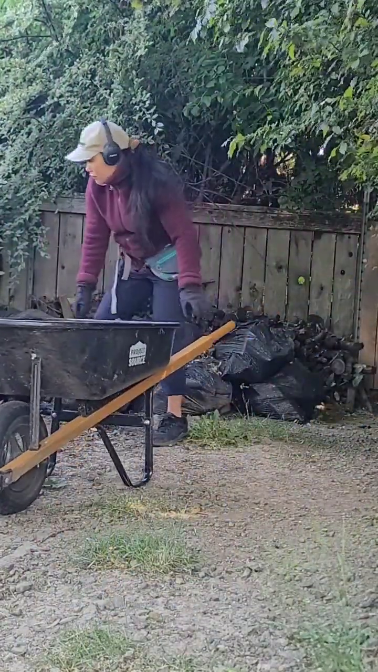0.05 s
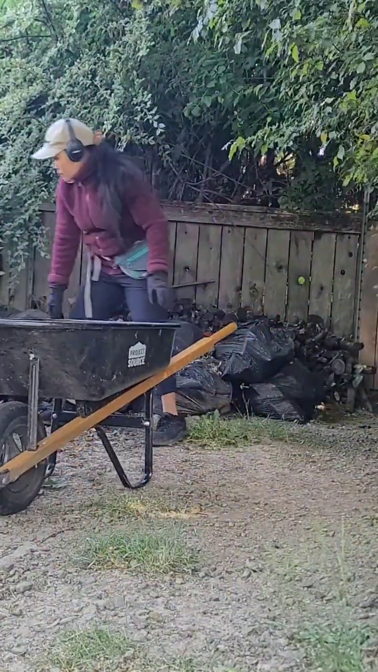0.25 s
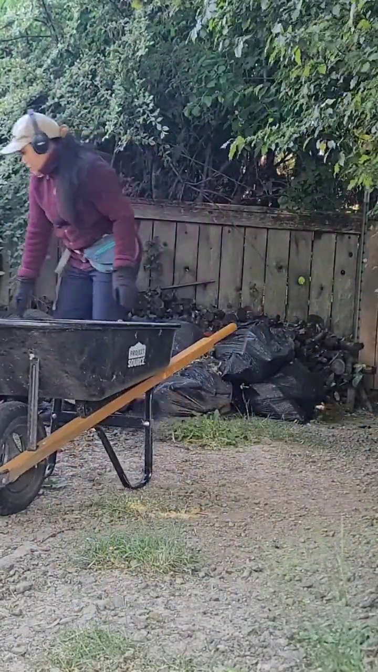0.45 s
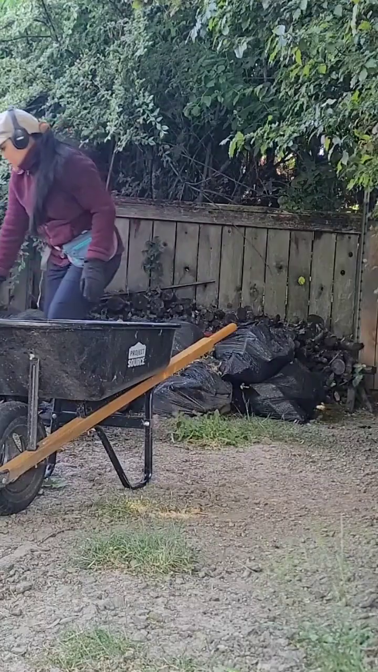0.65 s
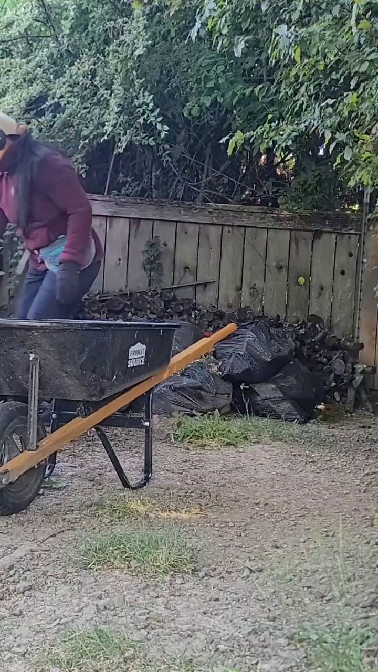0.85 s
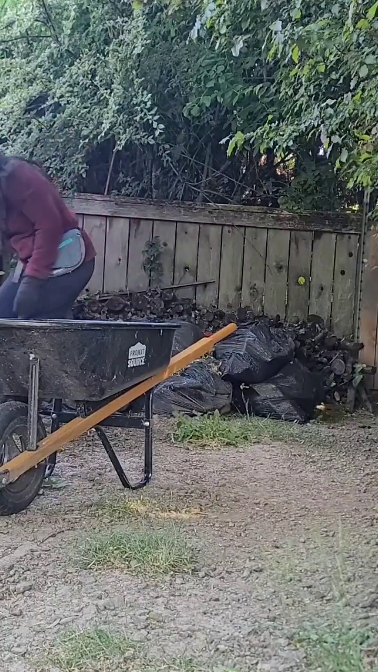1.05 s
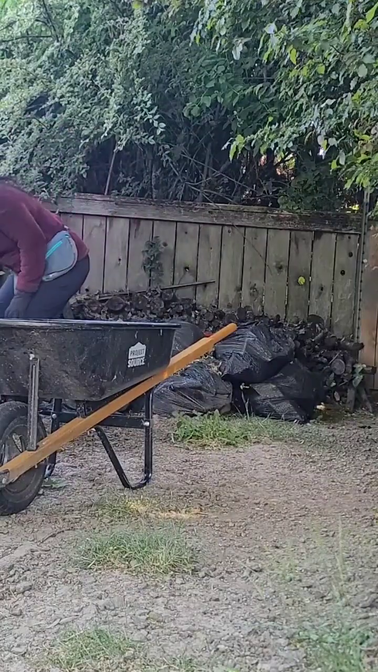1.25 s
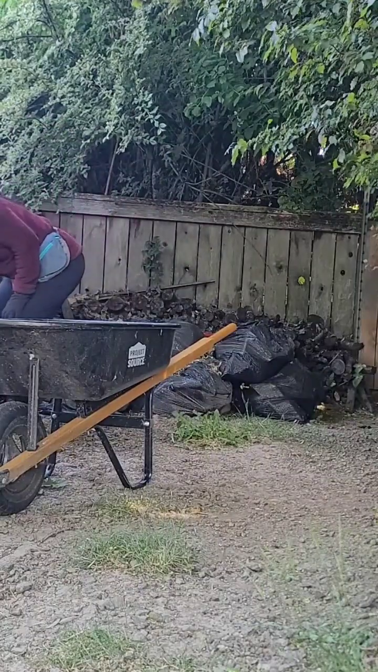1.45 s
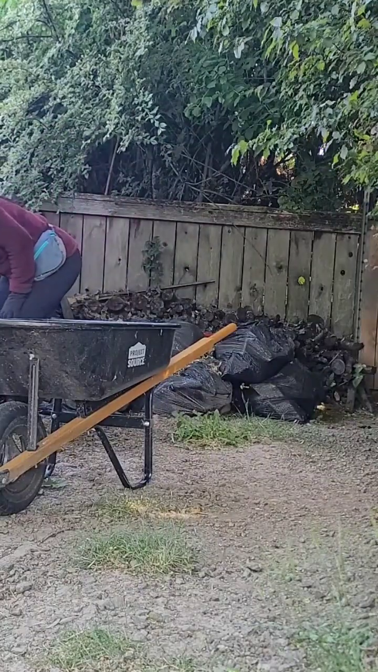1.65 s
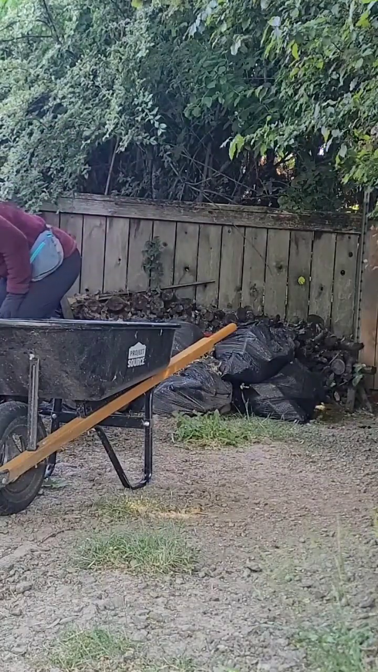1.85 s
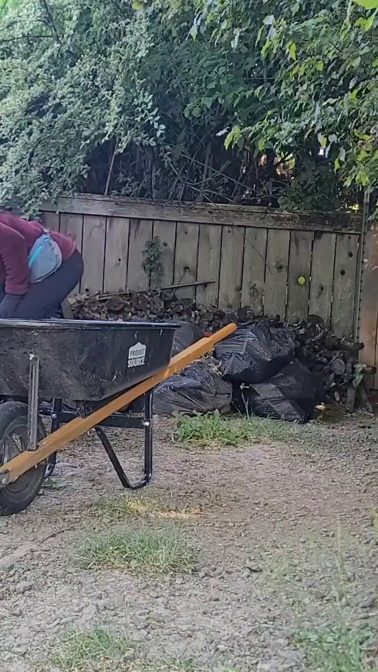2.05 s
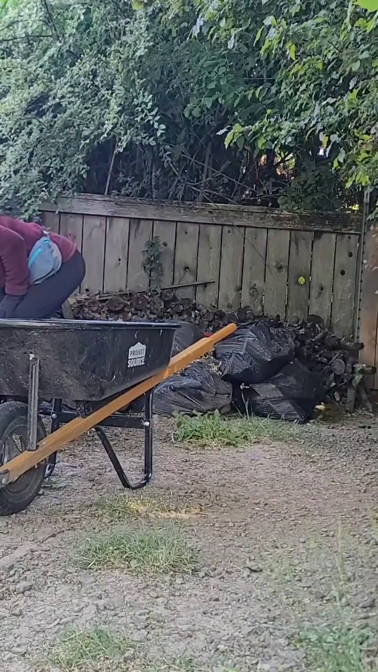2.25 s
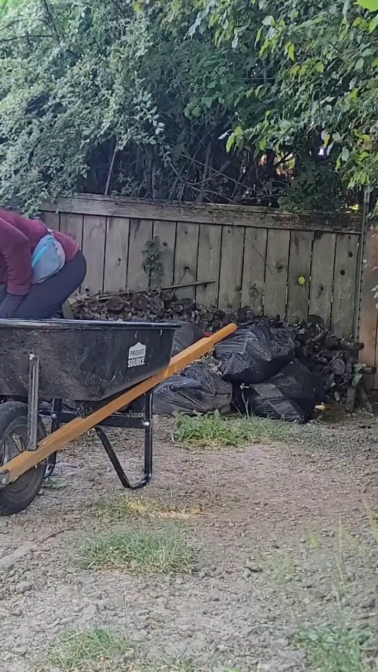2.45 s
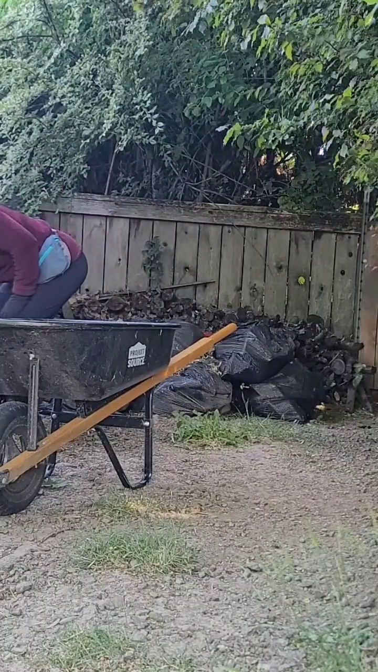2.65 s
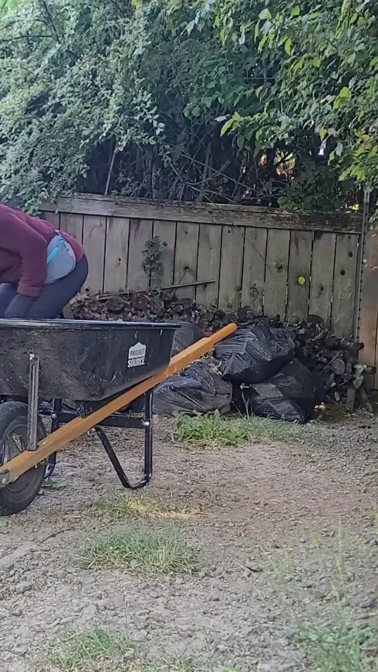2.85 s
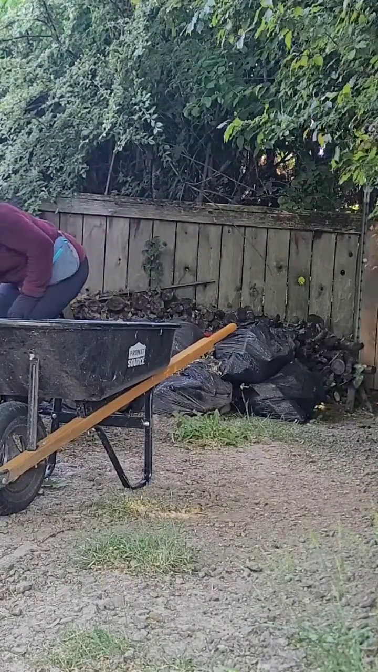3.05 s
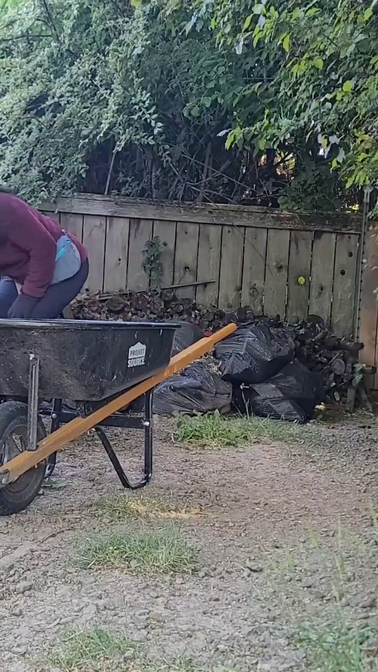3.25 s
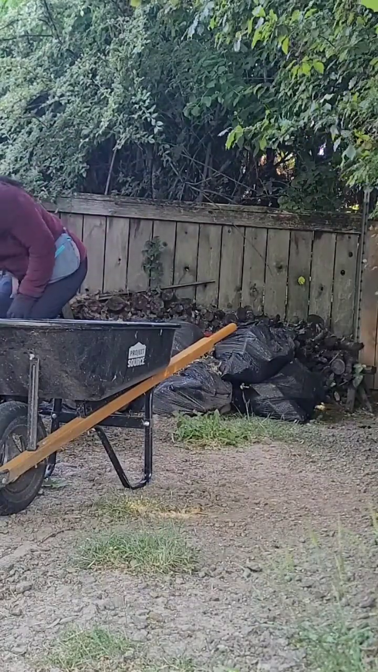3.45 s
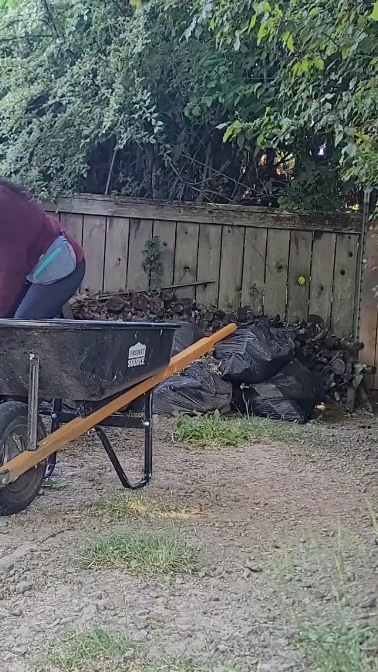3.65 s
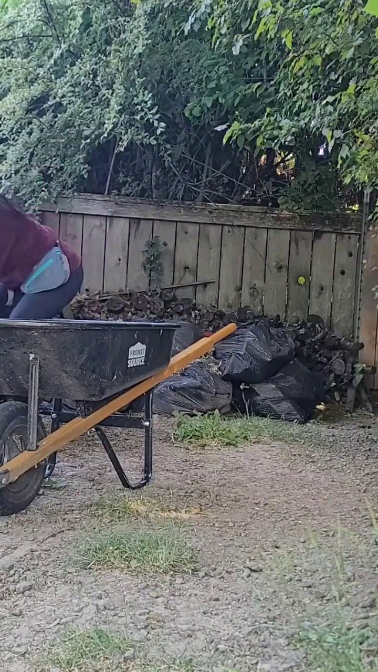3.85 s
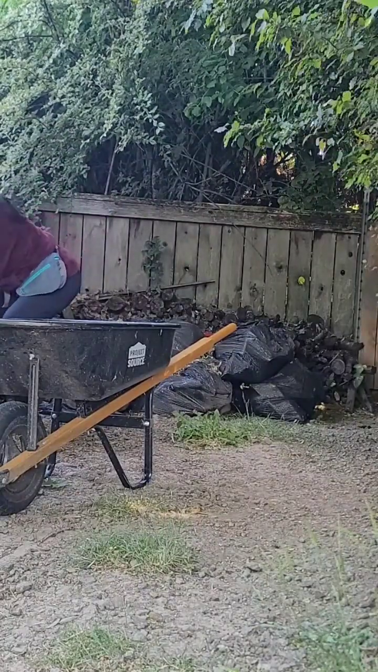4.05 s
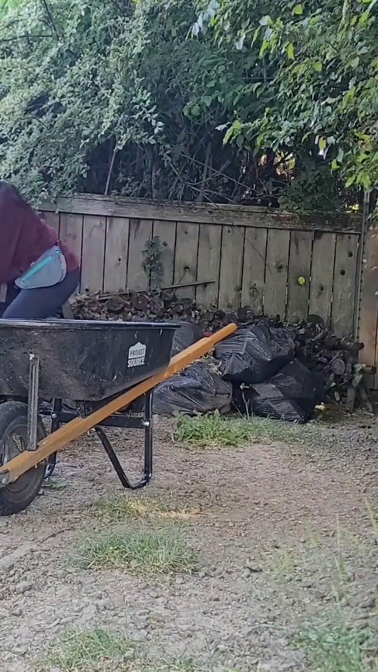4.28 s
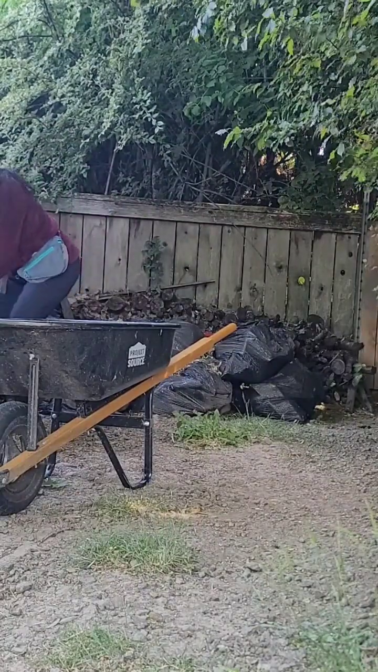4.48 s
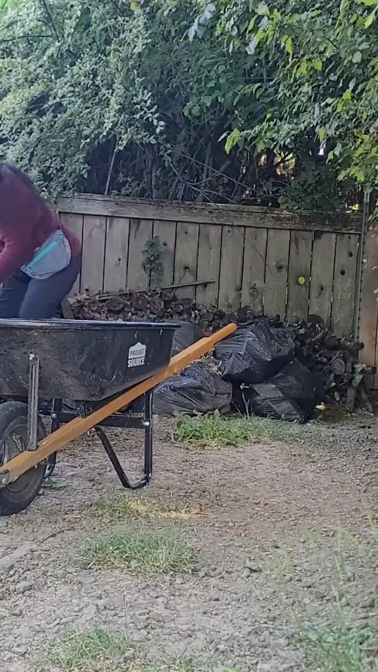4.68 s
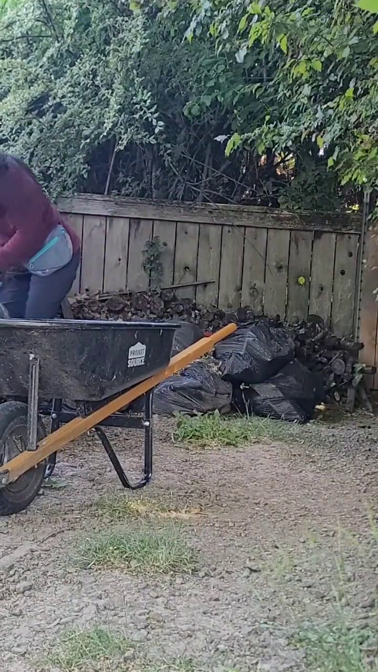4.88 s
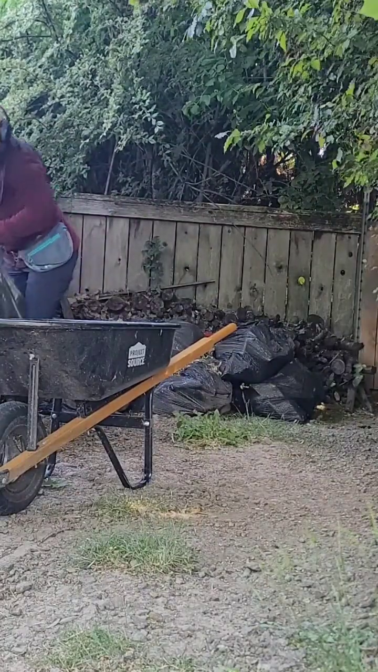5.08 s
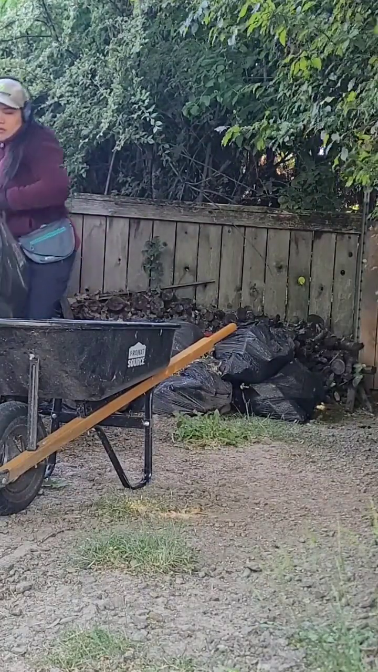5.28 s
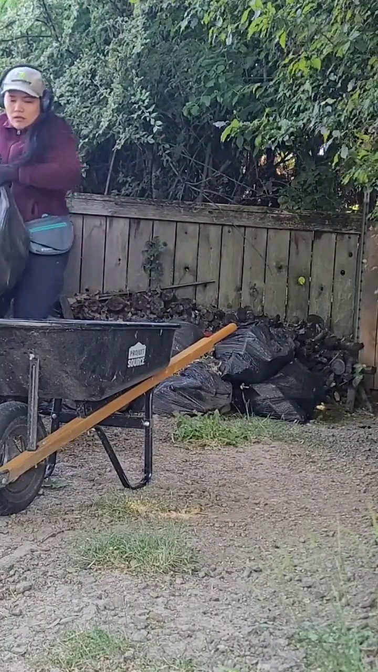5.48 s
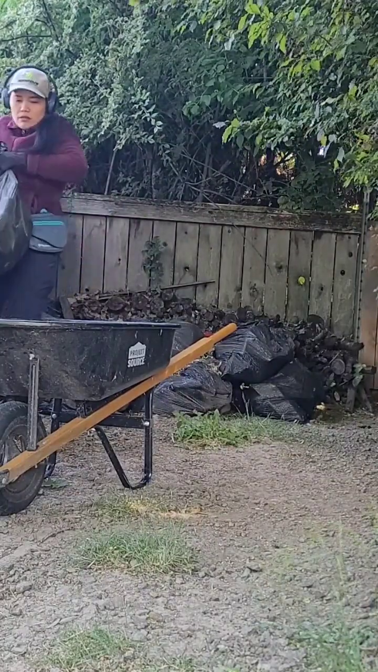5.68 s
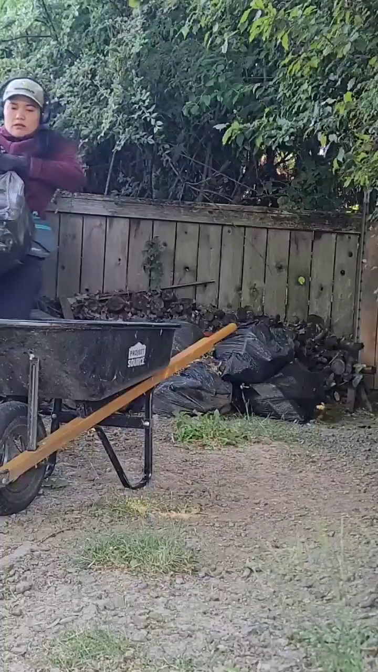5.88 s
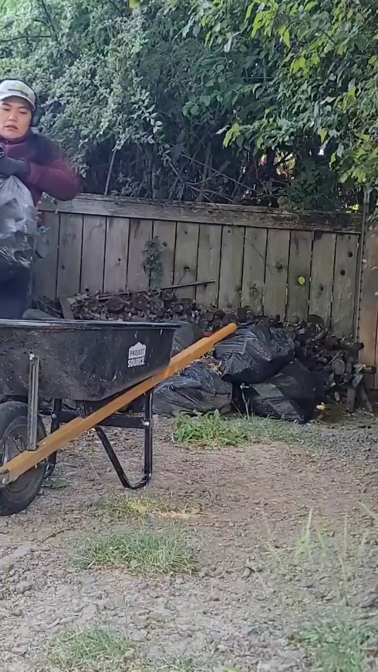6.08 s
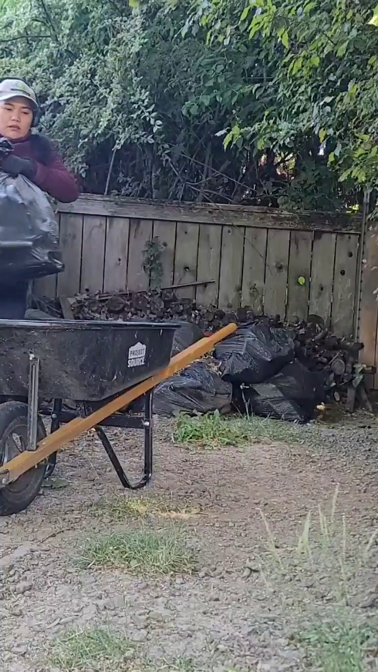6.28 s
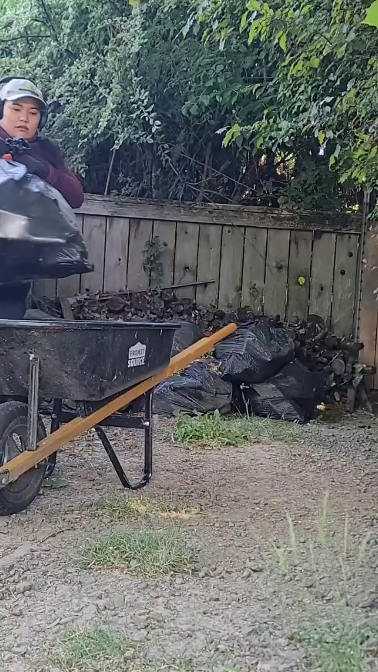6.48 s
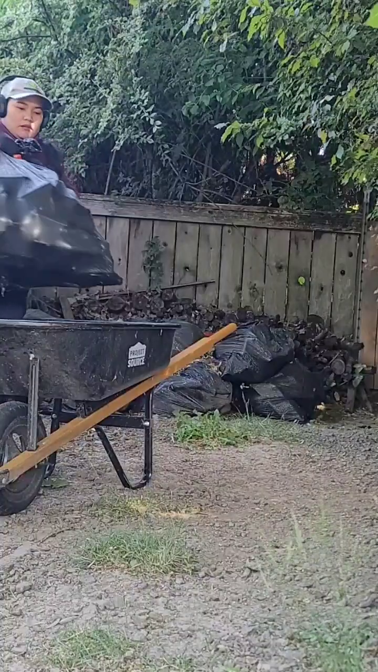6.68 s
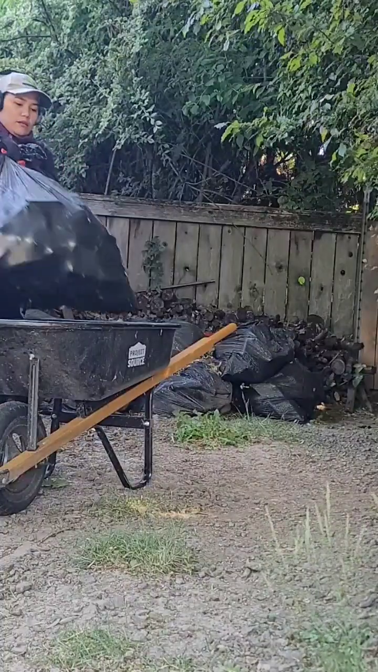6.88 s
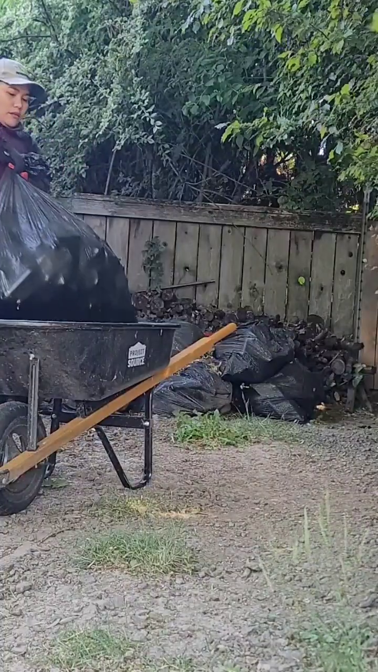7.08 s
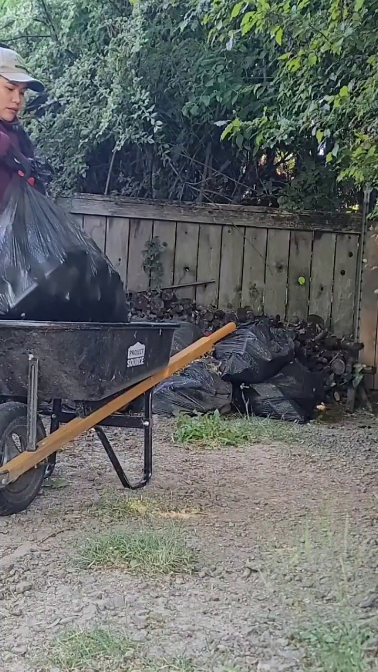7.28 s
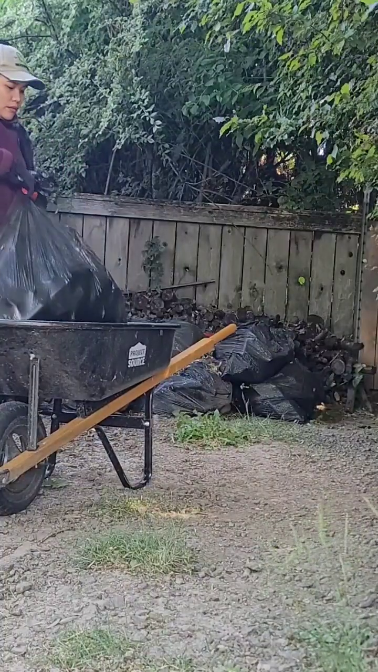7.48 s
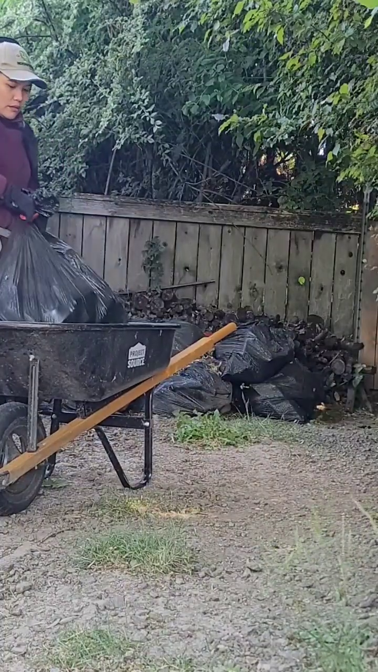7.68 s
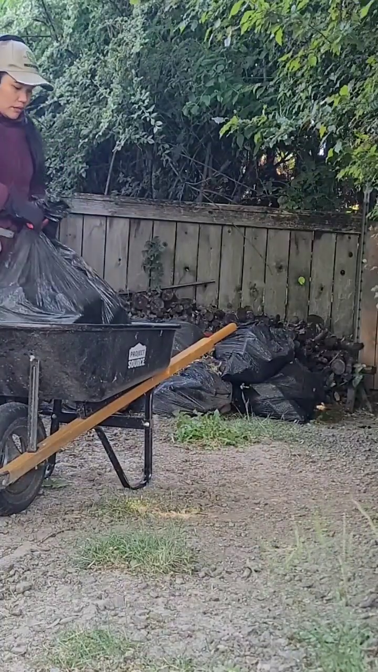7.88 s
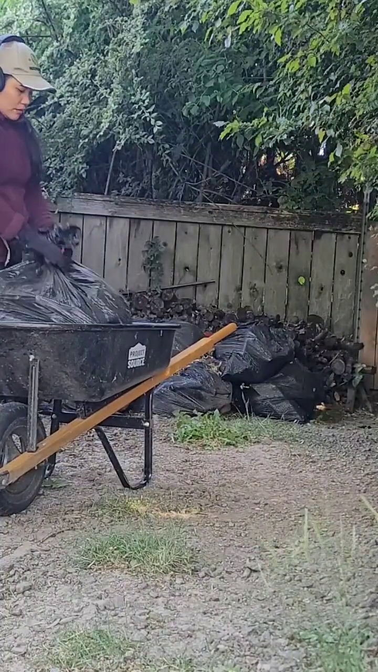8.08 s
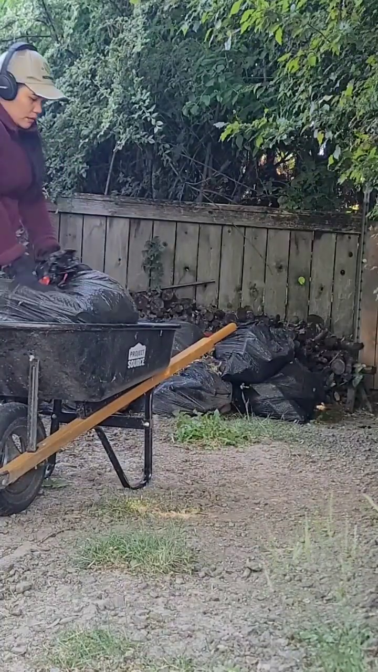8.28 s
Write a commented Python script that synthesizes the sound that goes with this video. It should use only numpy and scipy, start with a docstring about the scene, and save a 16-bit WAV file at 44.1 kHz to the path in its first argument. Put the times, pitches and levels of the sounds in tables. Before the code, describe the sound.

A quiet yard carries a faint hum of distant traffic and a low, light wind. A soft thud comes at the start, then a few small clinks and another dull bump near 1.8 seconds. From about 2.3 seconds a plastic sack of empty drink cans is tugged about: the cans clink and clack in uneven bursts while the plastic crackles, strongest between 3 and 4 seconds and thinning out by 5. At around 5.7 seconds the sack is lifted with a sharp rattle and a soft thump, followed by a short lull. The cans clash again at 6.8 seconds, and just before 7 the sack lands in a steel wheelbarrow with a hollow boom. Dense clattering, rustling and more thuds follow near 7.6 and 8.2 seconds as the load shifts and settles. Slight dull echoes surround the knocks.

```python
"""Empty drink cans clink and clack in plastic sacks, dragged, lifted and dropped into a steel barrow.
The cans knock together by the hundred: stiff ends give the clink, thin walls the clack. Creases in the
sack film crackle, the tray booms under the load, and feet and sacks land with soft thuds.
A quiet yard adds a few dull echoes; far traffic and a light wind lie underneath."""
import sys
import numpy as np
from scipy import signal
from scipy.io import wavfile

SR = 44100
rng = np.random.default_rng(int(sys.argv[2]) if len(sys.argv) > 2 else 0)


def to_wav(sig):
    """Store sig (one row per channel, or 1-D mono) as 16-bit WAV at the path in sys.argv[1].

    Samples outside -1..1 are clipped; the rate is SR.
    """
    pcm = np.clip(np.atleast_2d(sig), -1, 1) * 32767
    pcm = np.round(pcm).astype(np.int16)
    wavfile.write(sys.argv[1], SR, pcm.T)  # frames by channels


N = 367353

# each tug, heave or drop stirs the load: (start [s], rise [s], hold [s], fall [s], then the top level of
# can ends [dB], can walls [dB], sack film at 7-8 kHz [dB], tray boom [dB], load bumps [dB])
HEAVE_CUES = [(0, 0.28, 0.011, 0.25, -72, -71, -70, -42.5, -47),
              (1.186, .21, 0.033, 0.21, -56.5, -55, -67, -68, -62.5),
              (1.549, 0.1, .01, 0.086, -57, -56.5, -79, -72, -70),
              (1.783, 0.036, 0.0085, 0.063, -70, -69, -61, -40, -36),
              (2.119, 0.014, 0.024, 0.099, -53, -79, -60, -73, -62),
              (2.271, 0.091, 0.049, 0.093, -44, -42, -51.5, -67, -52),
              (2.385, 0.044, 0.045, 0.14, -30.5, -31.5, -61, -51, -49.5),
              (2.48, 0.06, .01, 0.15, -28.5, -51, -56, -62, -45.5),
              (2.55, 0.045, 0.41, 0.13, -48.5, -49.5, -71, -72, -64),
              (2.93, 0.045, .01, 0.24, -44, -41.5, -56, -71, -58),
              (2.977, .13, 0.12, 0.28, -35.5, -32.5, -53.5, -53, -45.5),
              (3.185, 0.065, 0.08, 0.17, -14.5, -25, -41, -42, -39.5),
              (3.334, 0.095, 0.1, 0.18, -14, -22.5, -31.5, -36, -35.5),
              (3.525, 0.04, 0.026, 0.11, -19.5, -28.5, -35.5, -41, -43),
              (3.728, 0.0527, .05, .1, -38, -36.5, -55.5, -57, -47),
              (3.832, 0.033, 0.023, 0.074, -33, -35.5, -48, -58, -55),
              (3.891, 0.0089, 0.059, 0.14, -24, -27, -47, -48, -41.5),
              (3.93, 0.069, .1, 0.073, -22, -24.5, -34.5, -41.5, -37.5),
              (4.118, .06, 0.044, 0.088, -36.5, -39.5, -57, -46, -34),
              (4.218, .04, 0.067, 0.054, -44, -42.5, -51, -56, -44.5),
              (4.333, 0.021, 0.035, 0.12, -65.5, -61, -48, -67, -41),
              (4.415, 0.033, 0.063, 0.092, -29.5, -28.5, -43, -45.5, -39),
              (4.56, 0.049, 0.075, .05, -53, -55, -64, -70, -70),
              (4.683, 0.0151, 0.0083, 0.06, -49, -47, -56, -64, -59),
              (4.892, 0.17, 0.012, 0.054, -49.5, -47.5, -63, -68, -58),
              (5.55, 0.067, 0.09, 0.13, -29, -25.5, -61.5, -50.5, -53),
              (5.683, .06, 0.0093, 0.08, -9.5, -14, -29.5, -30, -43.5),
              (5.728, .05, 0.014, 0.11, -29, -26.5, -37, -50.5, -57),
              (5.797, 0.053, .03, 0.22, -40.5, -47, -66, -69, -79),
              (6.548, 0.13, .03, 0.087, -54, -43, -68, -54, -61),
              (6.747, 0.023, 0.008, 0.03, -28, -35, -34, -54, -52),
              (6.762, 0.044, 0.063, 0.046, -31, -33, -58, -54, -55),
              (6.936, 0.0188, 0.061, 0.061, -19.5, -18, -32.5, -20, -17),
              (7.005, 0.028, 0.031, 0.21, -35.5, -30.5, -53, -36, -30),
              (7.1, .05, 0.16, 0.14, -55, -45, -64, -39, -41),
              (7.21, 0.018, 0.019, 0.052, -55.5, -51.5, -51, -50, -46),
              (7.295, 0.083, 0.028, 0.17, -19, -18, -36, -29.5, -33.5),
              (7.452, .06, 0.0065, 0.24, -18.5, -17.5, -35, -25.5, -26.5),
              (7.52, 0.04, 0.047, 0.3, -16, -18, -34.5, -33, -26.5),
              (7.713, 0.053, 0.098, 0.18, -23.5, -29, -41.5, -38, -38.5),
              (7.808, 0.089, 0.06, 0.54, -13, -21.5, -33.5, -28, -27),
              (8.103, 0.048, 0.013, 0.063, -19.5, -23.5, -41, -40, -28.5),
              (8.233, 0.051, .05, .1, -23, -26.5, -53, -44, -40)]
# the floor between heaves: (ends [dB], walls [dB], film [dB], boom [dB], bumps [dB])
RESTING_DB = [-67, -71.5, -72.5, -64, -67.5]
# jolts that knock several cans at once: (time [s], level [dB], walls over ends [dB], left over right [dB],
# t60 of the run [s], pitch of the one can that rings clear [Hz], its level [dB])
JOLT_CUES = [(0.102, -44, 16, -5, 0.17, 3980, -59), (0.14, -46, 19, .5, .18, 4140, -68),
             (1.303, -46, 22, 1.5, 0.1, 3600, -65), (1.424, -23, 7.5, 5.5, 0.15, 5500, -47),
             (1.631, -17, -6.5, 3, 0.13, 5930, -75), (2.14, -55, 5, -3, .07, 5900, -66),
             (2.324, -13, 1.5, 5, 0.2, 5350, -37), (2.408, -28, 13, -1, 0.41, 6300, -40),
             (2.436, -8.5, -2, -4, 0.14, 3720, -29), (2.458, 0, -8, 3.5, 0.35, 3550, -16.5),
             (2.532, 6.5, -2.5, 6.5, 0.13, 5740, -35), (2.64, -27, 1, -7, .05, 6060, -38.5),
             (2.687, -10.5, -2.5, -4, 0.086, 3594, -24.5), (2.703, -10.5, -4, 4, 0.1, 5190, -34),
             (2.802, -11, -7.5, 11.5, 0.11, 5620, -47.5), (2.897, -16.5, -1.5, 14.5, 0.35, 5210, -48),
             (2.985, -10, 5.5, 11, 0.025, 3470, -45), (3.06, -9, 2, 6, .28, 3590, -28),
             (3.12, -4.5, -3, 4, 0.25, 5890, -35), (3.226, 1, 4, -1, 0.3, 3600, -15),
             (3.77, -24, 10, 1, 0.48, 3610, -27), (3.902, 9, -19, 4.5, 0.42, 3600, -29),
             (3.961, 1.5, 0.5, 3, .17, 5190, -21.5), (4.214, -21, 10.5, 1, 0.079, 5100, -39),
             (4.261, -18.5, 8.5, 5, 0.35, 5120, -35), (4.292, -14, 1, -2, .34, 3600, -50),
             (4.434, -15.5, 17.5, 4, 0.092, 5200, -38), (4.453, -5.5, 7, -1, 0.25, 3700, -34),
             (4.489, -6.5, 10, 2, 0.13, 6360, -38), (4.546, -20, -5, 9, 0.066, 3820, -38),
             (4.623, -28.5, 14, 4, .05, 3620, -39), (4.679, -14, 6, 3, 0.056, 3660, -37),
             (4.699, -24.5, 5, -5, 0.089, 5480, -45), (5.032, -42, 13, -4, .18, 3700, -49),
             (5.07, -14.5, 4.5, 6.5, .04, 5190, -35), (5.272, -40, 13.5, 3, 0.087, 5200, -63),
             (5.542, -37, 9, 4, .1, 3680, -60.5), (5.562, -37, 6, 28, 0.41, 5030, -59),
             (5.6, -20, 8, 3, .1, 3520, -30), (5.633, -14.5, 18, 5, 0.26, 3720, -40),
             (5.686, -0.5, 4.5, 7, 0.36, 3660, -29), (5.711, 4, 5, 11, 0.32, 3510, -23),
             (6.201, -36.5, 12.5, 0, .073, 6040, -69.5), (6.363, -43.5, 17, 5.5, 0.16, 4770, -70),
             (6.382, -39, 14.5, 4.5, 0.2, 4010, -62), (6.624, -41, 12.5, 2, .13, 5920, -70.5),
             (6.658, -31.5, 20, 2, 0.075, 5380, -59), (6.7, -22.5, 14.5, 1, 0.2, 3670, -42),
             (6.758, 12, -.6, 3, 0.11, 3550, -47), (6.866, -14, -5, 12, 0.14, 3660, -50),
             (6.951, 6.5, 8.5, 0.5, 0.27, 3620, -17), (7.224, -30, 14, 5, .084, 3980, -46),
             (7.31, -17, 15, 3, 0.25, 3900, -41), (7.328, -19, 18, 1, 0.2, 3470, -42),
             (7.366, -14, 7, 15, 0.11, 3530, -33), (7.503, -16, 5, -8, .12, 5500, -16),
             (7.575, -10, 12, 8, 0.17, 3840, -19), (7.782, -10, 9.5, -1.5, 0.51, 3700, -33),
             (7.833, 8.5, -4, 13, 0.48, 3520, -43), (8.012, -3.5, 8, -5, 0.28, 3380, -25),
             (8.151, 12.5, -6.5, 3, .068, 3440, -16), (8.27, 0, 1.5, 0, 0.52, 3550, -27)]
# feet and sacks landing on ground and tray: (time [s], level [dB], pitch [Hz], t60 [s])
THUD_CUES = [(0.135, -26, 155, 0.069), (0.182, -33, 223, 0.35), (1.814, -14, 271, 0.061),
             (5.72, -25, 176, 0.13), (6.952, -8, 164.6, 0.11), (6.986, -32, 156, 0.084),
             (7.571, -3, 173, 0.11), (8.155, -19, 157, 0.2)]
# modes of can ends, can walls, steel tray and padded load:
# (pitch [Hz], share of power [dB], t60 [s], detune between bodies [share of pitch])
END_MODES = [(3557, -5, .11, .022), (3720, -4.5, 0.064, .045), (4020, -11, 0.019, 0.058),
             (5203, -5.5, 0.067, 0.025), (5638, -5.5, 0.025, 0.05), (6160, -7.5, 0.058, .03),
             (8490, -8.5, 0.095, 0.024), (9030, -7, 0.05, 0.022), (10360, -19, 0.028, 0.024),
             (10940, -31, 0.025, 0.021), (12600, -31, .02, .012), (12300, -26, .02, .015),
             (14800, -29.5, 0.018, .02), (15600, -31.5, .02, .01)]
WALL_MODES = [(760, -6, .025, .14), (1000, -4, .025, .12), (1280, 0, .028, .1), (1600, -1, .022, .1),
              (1950, -4, .018, .1), (2400, -8, .014, .1), (2900, -10, .014, .08)]
TRAY_MODES = [(125, 0, 0.21, 0.061), (167.2, 8.5, 0.12, 0.22), (217.6, -1.5, 0.73, 0.12)]
LOAD_MODES = [(300, -4, .035, .15), (390, -2, .035, .12), (470, 0, .035, .1), (560, -2, .03, .1)]
# can tone, mostly dips where cans radiate little: (centre [Hz], width [Hz], gain [dB])
CAN_EQ = [(4360, 1500, 1), (7720, 1500, -13), (9500, 690, -16), (12900, 250, -17.5)]
# tone of sack film, far traffic and wind: (frequency [Hz], relative density [dB])
FILM_SPECTRUM = [(500, -25.5), (1200, 0), (3000, -9.5), (7400, -2.5), (11000, -15), (16000, -14.5)]
TRAFFIC_SPECTRUM = [(76, -35), (130, -2.5), (285, -29), (363, -16), (410, -25.5), (532, -21), (589, -28),
                    (812, -10.5), (935, -24.5), (1460, -18.5), (2090, -25.5), (2610, -17), (7440, -29.5),
                    (16000, -47.5)]
WIND_SPECTRUM = [(12, -41), (20, -14), (65, 13), (76, -9.5), (92, -6), (118, -21.5), (200, -49), (260, -39),
                 (440, -120)]
# how much later the load reaches the right side: (time [s], lag [samples])
RIGHT_LAG = [(0, 4.5), (2, 6.2), (4.5, 6), (5.7, 4.1), (7, 4.1), (8.33, 3.3)]
# slaps off ground, fence and walls: (delay [s], level [dB])
YARD_ECHOES = [(.004, -21.5), (.011, -12.5), (.019, -13.5), (.033, -12), (.052, -16.5), (.081, -21.5)]
# the wind's swells: (time [s], level [dB], left over right [dB])
WIND_GUSTS = [(0, -44.5, -6), (.25, -47, 8), (.4, -54, 7), (.6, -46, -1), (1.3, -50, -7), (2.0, -54, 1),
              (2.5, -48, 8), (2.75, -53.5, -1), (3.4, -47.5, 0), (3.8, -48, 1), (4.8, -51.5, -2),
              (5.4, -44.5, 14.5), (5.75, -42.5, 1), (5.94, -48.5, 7.5), (6.04, -42, 1), (6.5, -52.5, -2.5),
              (7.1, -40.5, 4), (7.4, -54, -7), (7.66, -47, 4), (8.33, -51, 1.5)]
# stereo image of the background: (frequency [Hz], left-right likeness [-1 to 1])
BED_LIKENESS = [(25, -0.76), (60, 1), (130, 0.67), (300, -1.9), (650, -0.22), (1400, -0.4), (3000, -0.84),
                (7000, -0.89)]


def cans(ends_db, walls_db, still_db=-65):
    """The harder the shake, the more cans touch; the same contacts sound ends and walls."""
    contacts_per_s = np.clip(1300 * amp(.6 * (ends_db + 20) + 3 * drift(14)), 160, 9000)
    at, sizes = contacts(contacts_per_s, uneven_db=-2)
    clatter = 0
    for level_db, modes, on_walls in [(ends_db, END_MODES, False), (walls_db, WALL_MODES, True)]:
        jolt_at, jolt_sizes, jolt_pan_db = jolts(on_walls)
        moving = level_db > still_db
        surge = (moving * amp(level_db + 2 * drift(4.1)))[at]
        clatter += ringing_bodies(np.append(at, jolt_at), np.append(sizes * surge, jolt_sizes),
                                  np.append(0 * at, jolt_pan_db), modes, width=.28, flicker_db=2.5, count=11)
    for hz, width_hz, gain_db in CAN_EQ:
        clatter = bell_eq(clatter, hz, width_hz, gain_db)
    return butterworth(clatter, "high", 749)   # small bodies push no bass


def jolts(on_walls, count=14, mean_gap_s=.0037):
    """Each jolt is one sharp contact and a fading run that follows within milliseconds."""
    time_s, first_db, walls_db, pan_db, t60 = np.transpose(JOLT_CUES)[:5]
    late_s = np.cumsum(rng.exponential(mean_gap_s, (len(time_s), count)), axis=1)
    late_s -= late_s[:, :1]
    fade_db = 60 * late_s / np.maximum(t60, .02)[:, None]
    level_db = (first_db + on_walls * walls_db)[:, None] - 7 - fade_db + rng.normal(0, .51, late_s.shape)
    at = np.minimum(((time_s[:, None] + late_s) * SR).astype(int), N - 1)
    return at.ravel(), amp(level_db).ravel(), np.repeat(pan_db, count)


def pings(t60=.13):
    """In each jolt one loose can is free to ring at its own pitch, a close pair of modes."""
    out, lag = np.zeros((2, N)), automation(RIGHT_LAG)[0]
    for time_s, _, _, pan_db, _, hz, level_db in JOLT_CUES:
        start = round(time_s * SR)
        t = np.arange(min(SR // 4, N - start)) / SR
        for side in range(2):
            phase = 2 * np.pi * hz * np.maximum(t - side * lag[start] / SR, 0)
            pair = np.sin(phase) + .4 * np.sin(1.02 * phase)
            out[side, start:start + len(t)] += amp(level_db - 60 * t / t60 + pan_db * (.5 - side)) * pair
    return out


def heaves(swing_db=25):
    """Envelopes of the five layers in dB: each heave rises by the swing, holds and falls; powers add."""
    t = np.arange(0, N + 64, 64) / SR
    power = amp(RESTING_DB)[:, None] ** 2
    for start, rise, hold, fall, *top_db in HEAVE_CUES:
        rise, fall = max(rise, .01), max(fall, .01)
        attack, release = (t - start) / rise - 1, (start + rise + hold - t) / fall
        shape_db = swing_db * np.minimum(0, np.minimum(attack, release))
        power = power + amp(np.array(top_db)[:, None] + shape_db) ** 2
    return np.array([np.interp(np.arange(N) / SR, t, 10 * np.log10(layer)) for layer in power])


def stick_slip(dip_db=3.5, hold_s=.032, release_s=.021):
    """The heap sticks just before a jolt and lets go at once: a dip, then a kick, in dB."""
    margin = SR // 8
    t, ride_db = np.arange(-SR // 8, margin) / SR, np.zeros(N + SR // 4)
    shape_db = dip_db * np.where(t < 0, -np.exp(t / hold_s), .5 * np.exp(-t / release_s))
    for time_s, *_ in JOLT_CUES:
        start = round(time_s * SR)
        ride_db[start:start + len(t)] += shape_db[:len(ride_db) - start]
    return ride_db[margin:margin + N]


def sack_film(level_db, snaps_per_s=6000):
    """Creases snap by the thousand, in clumps; the cans under the film lend it part of their colour."""
    snaps = [stereo_clicks(*contacts(np.full(N, snaps_per_s), uneven_db=-1), 0, scatter=4.2, width=.52)
             for _ in range(2)]
    crackle = colour(snaps, FILM_SPECTRUM)
    crackle /= butterworth(crackle, "band", [6900, 7900]).std()
    for hz, width_hz, gain_db in CAN_EQ:
        crackle = bell_eq(crackle, hz, width_hz, .5 * gain_db)
    return amp(level_db + 1.78 * drift(25)) * crackle


def bumps(level_db, modes, width, bumps_per_s=500):
    """Soft, padded contacts of the load on the tray and the ground."""
    at, sizes = contacts(np.full(N, bumps_per_s), uneven_db=2)
    rings = ringing_bodies(at, sizes * amp(level_db[at]), 0 * at, modes, width, flicker_db=0, count=3)
    return butterworth(rings, "band", [.96 * modes[0][0], 1.06 * modes[-1][0]], order=2)


def thuds(attack_s=.0028):
    """Padded blows of feet and sacks: a main pitch and two overtones that die sooner."""
    out = np.zeros((2, N))
    for time_s, level_db, hz, t60 in THUD_CUES:
        start = round(time_s * SR)
        t = np.arange(min(SR // 2, N - start)) / SR
        for ratio, partial_db in [(1, -4.5), (1.7, -10), (2.8, -9)]:
            envelope = amp(level_db + partial_db - 60 * ratio * t / t60) * (1 - np.exp(-t / attack_s))
            out[:, start:start + len(t)] += envelope * np.sin(2 * np.pi * hz * ratio * t)
    return out


def yard_echoes(direct):
    """The direct sound plus dull slaps off ground, fence and walls, each later on one side."""
    dull = butterworth(direct, "band", [350, 7000], order=1)
    out = direct.copy()
    for k, (delay_s, level_db) in enumerate(YARD_ECHOES):
        for side in range(2):
            lag = round(delay_s * SR * (1 + .13 * side * (-1) ** k))
            out[side, lag:] += amp(level_db) * dull[(side + k) % 2, :N - lag]
    return out


def far_traffic(level_db=-57):
    """A distant hum: noise whose bands waver separately."""
    noise = rng.standard_normal((2, 2, N))
    return amp(level_db) * colour(noise, TRAFFIC_SPECTRUM, BED_LIKENESS, waver_db=-2.5)


def wind(flicker_db=2.5, sway_db=4.5):
    """A low rumble that swells with the gusts, flickers and sways from side to side."""
    gust_db, pan_db = automation(WIND_GUSTS)
    gust_db += flicker_db * drift(8.1)
    pan_db += sway_db * drift(3)
    rumble = colour(rng.standard_normal((2, 2, N)), WIND_SPECTRUM, BED_LIKENESS, waver_db=1.5)
    return amp(gust_db + pan_db * [[.5], [-.5]]) * rumble


def contacts(per_s, uneven_db):
    """Random contacts: sample positions, and sizes that give the stream unit power."""
    at = np.flatnonzero(rng.random(N) < per_s / SR)
    sizes = amp(uneven_db * np.minimum(rng.exponential(1, N), 3.5))[at]
    return at, sizes / np.sqrt(np.mean(sizes ** 2)) * np.sqrt(SR / per_s[at])


def stereo_clicks(at, sizes, pan_db, scatter, width, bend=0):
    """The right side lags; bodies radiate unevenly, so a share of each side's power (width) is its own."""
    lag = np.round(automation(RIGHT_LAG)[0][at] + bend + scatter * rng.standard_normal(N)[at]).astype(int)
    *own, shared = rng.standard_normal((3, N))[:, at]
    clicks = np.zeros((2, N))
    for side, arrival in enumerate([at, np.clip(at + lag, 0, N - 1)]):
        strength = np.sqrt(1 - width) * np.sign(shared) + np.sqrt(width) * own[side]
        np.add.at(clicks[side], arrival, sizes * strength * amp(pan_db * (.5 - side)))
    return clicks


def ringing_bodies(at, sizes, pan_db, modes, width, flicker_db, count):
    """Contacts are dealt to several bodies, each with the same modes a little out of tune."""
    total_gain = np.sqrt(np.sum(amp(np.array(modes)[:, 1]) ** 2))
    bend = 1.8 * (modes[0][0] < 3000)   # extra lag [samples]: long waves bend round the microphone body
    struck, out = rng.integers(0, count, N)[at], np.zeros((2, N))
    for body in range(count):
        hits = struck == body
        clicks = stereo_clicks(at[hits], sizes[hits], pan_db[hits], scatter=1.2, width=width, bend=bend)
        for hz, share_db, t60, detune in modes:
            place = rng.permutation(count)[body] + rng.random()   # anywhere across the detune range
            body_hz = hz * (1 + detune * (2 * place / count - 1))
            flicker = np.repeat(amp(flicker_db * rng.standard_normal(N // 64 + 1)), 64)[:N]
            out += amp(share_db) / total_gain * resonator(clicks * flicker, body_hz, t60)
    return out


def resonator(clicks, hz, t60):
    """One mode, its gain scaled so that a long ring carries no more energy than a short one."""
    r, w = amp(-60 / (t60 * SR)), 2 * np.pi * hz / SR
    gain = np.sin(w) * np.sqrt(2 - 2 * r * r)
    return signal.lfilter([0, gain], [1, -2 * r * np.cos(w), r * r], clicks + 1e-18)


def colour(pairs, spectrum, likeness=None, waver_db=0):
    """Half-octave EQ at unit RMS; two pairs feed the bands in turn, as mid and side if given a likeness."""
    out, edges = 0, 20 * 2 ** np.arange(0, 10, .5)
    for k, (low, high) in enumerate(zip(edges, np.append(edges[1:], 19000))):
        hz = np.sqrt(low * high)
        if not spectrum[0][0] / 1.2 < hz < spectrum[-1][0] * 1.2:
            continue
        band = butterworth(pairs[k % 2], "band", [low, high], order=2)
        if likeness:
            alike = np.clip(at_hz(likeness, hz), -1, 1)
            mid, side = np.sqrt(1 + alike) * band[0], np.sqrt(1 - alike) * band[1]
            band = (mid + side * [[1], [-1]]) * amp(waver_db * drift(6.2))
        out += amp(at_hz(spectrum, hz)) * band
    return out / np.sqrt(np.mean(out ** 2))


def butterworth(x, kind, hz, order=4):
    """High-, low- or band-pass."""
    return signal.sosfilt(signal.butter(order, hz, kind, fs=SR, output="sos"), x)


def bell_eq(x, hz, width_hz, gain_db):
    """A bell-shaped dip or lift."""
    a, half = amp(gain_db / 2), np.pi * width_hz / SR
    centre = -2 * np.cos(2 * np.pi * hz / SR)
    return signal.lfilter([1 + half * a, centre, 1 - half * a], [1 + half / a, centre, 1 - half / a], x)


def drift(rate_hz):
    """Smooth random modulation with unit spread, drawn every 40 samples."""
    r = np.exp(-2 * np.pi * rate_hz * 40 / SR)
    slow = signal.lfilter([1], [1, -2 * r, r * r], rng.standard_normal(N // 40 + 2002))[2000:]
    return np.interp(np.arange(N) / 40, np.arange(len(slow)), slow / slow.std())


def automation(rows):
    """Timed breakpoints as curves, one value per sample."""
    time_s, *columns = np.transpose(rows)
    return [np.interp(np.arange(N) / SR, time_s, column) for column in columns]


def at_hz(points, hz):
    """Read a curve on a log-frequency axis."""
    point_hz, values = np.transpose(points)
    return np.interp(np.log(hz), np.log(point_hz), values)


def amp(db):
    """Gain of a dB value."""
    return 10 ** (np.asarray(db) / 20)


def scene():
    """Sacks of cans in the yard, over a bed of traffic and wind."""
    ends_db, walls_db, film_db, boom_db, bump_db = heaves() + stick_slip()
    sacks = cans(ends_db, walls_db) + pings() + sack_film(film_db)
    tray_boom = bumps(boom_db, TRAY_MODES, width=.08)
    load_bumps = bumps(bump_db, LOAD_MODES, width=.44)
    return yard_echoes(sacks + tray_boom + load_bumps + thuds()) + far_traffic() + wind()


def record(dry, ceiling=1.3, cutoff_hz=15700):
    """Soft saturation rounds the peaks; a steep low-pass trims the top."""
    rounded = ceiling * np.tanh(dry / ceiling)
    return signal.sosfilt(signal.ellip(10, .5, 70, cutoff_hz, fs=SR, output="sos"), rounded)


dry = scene()
out = record(dry)
to_wav(out)
```